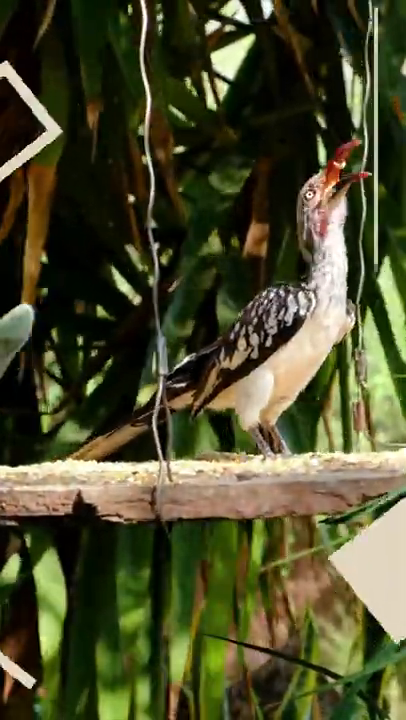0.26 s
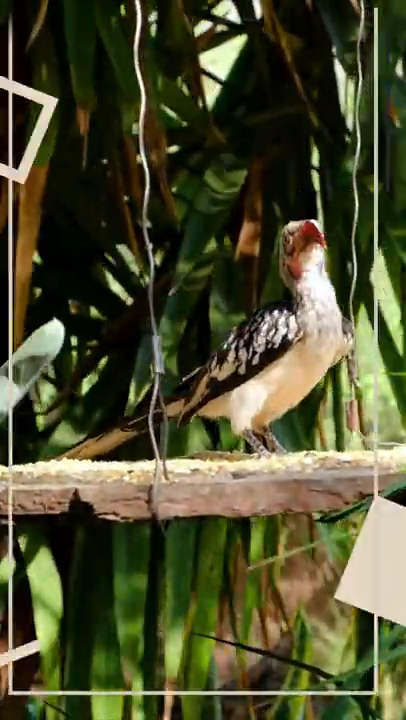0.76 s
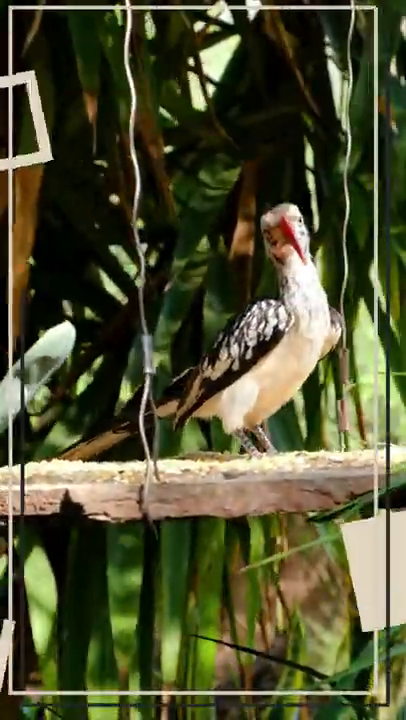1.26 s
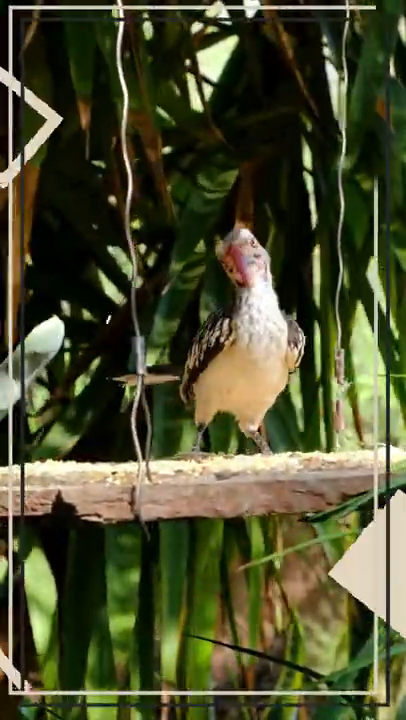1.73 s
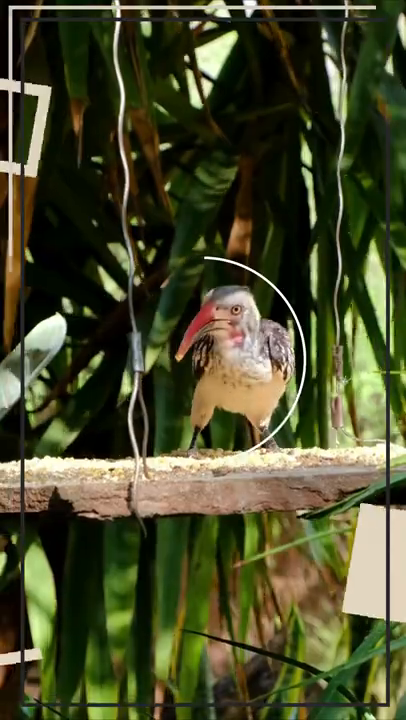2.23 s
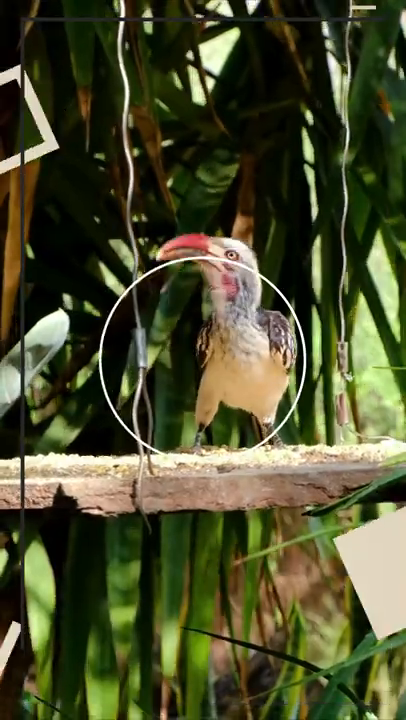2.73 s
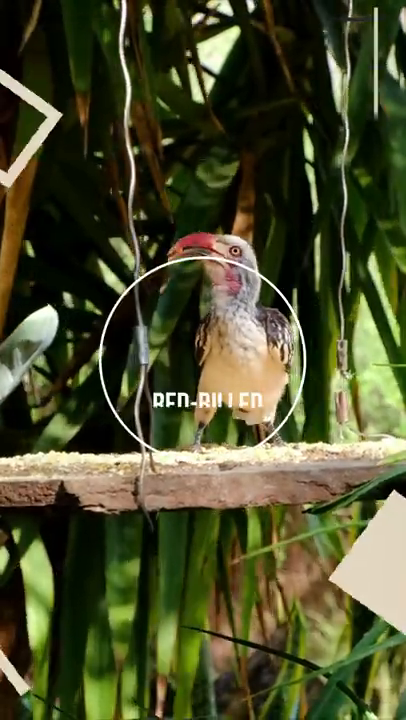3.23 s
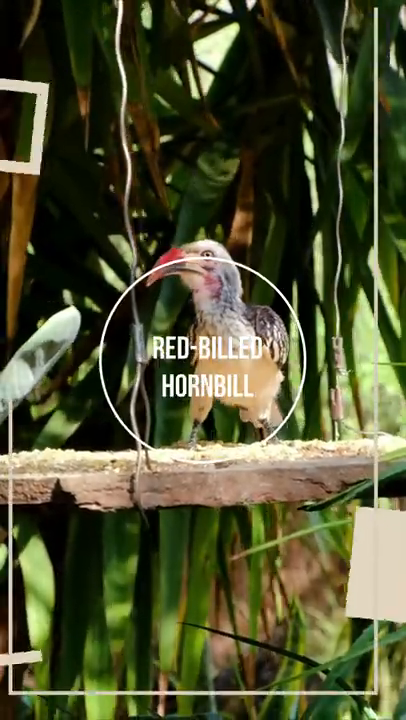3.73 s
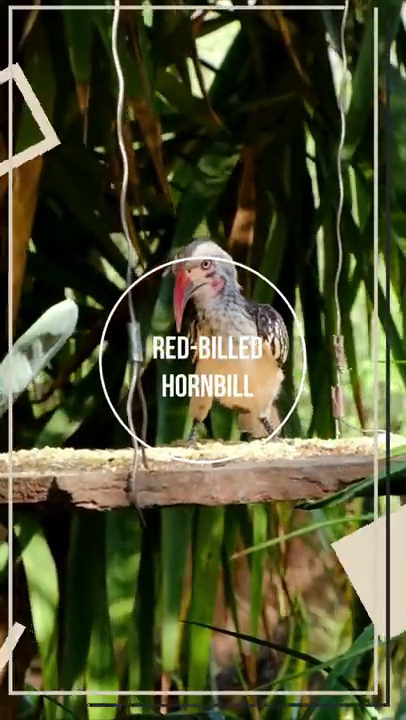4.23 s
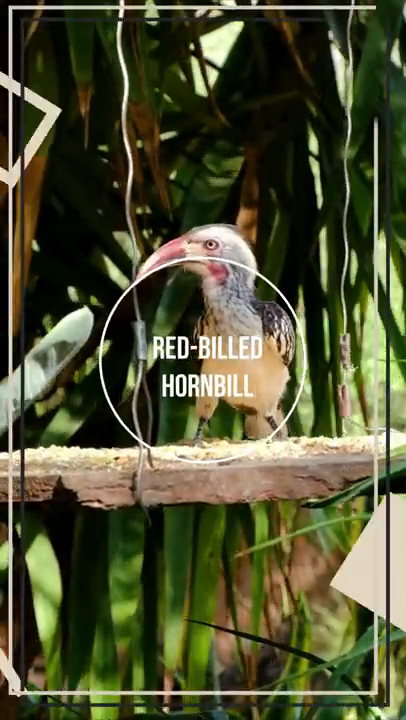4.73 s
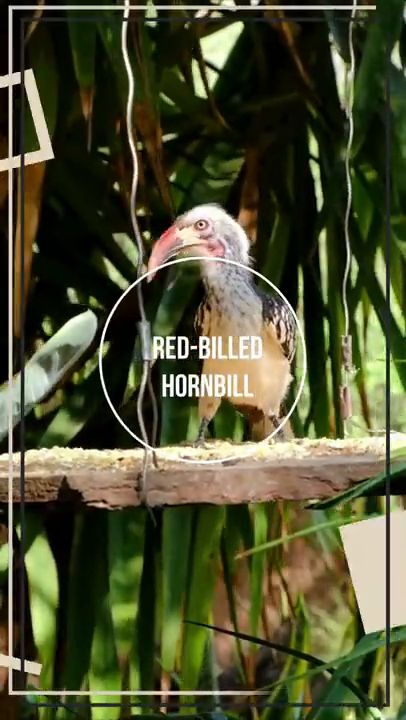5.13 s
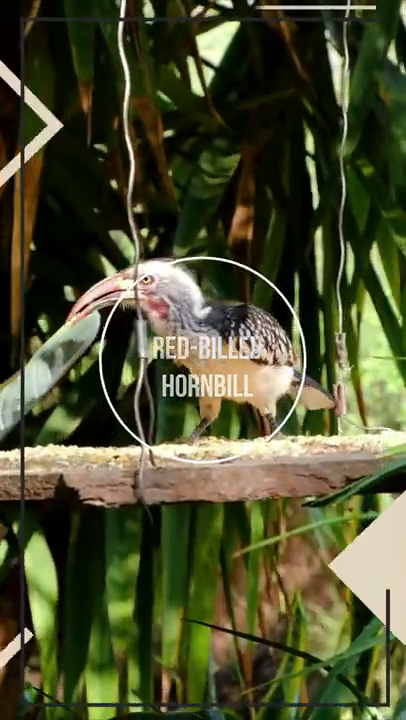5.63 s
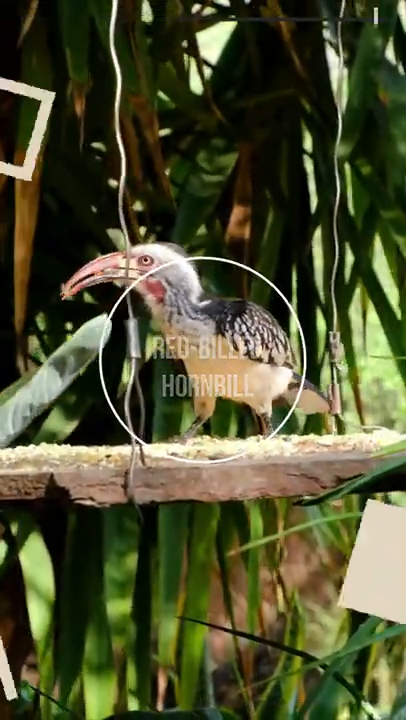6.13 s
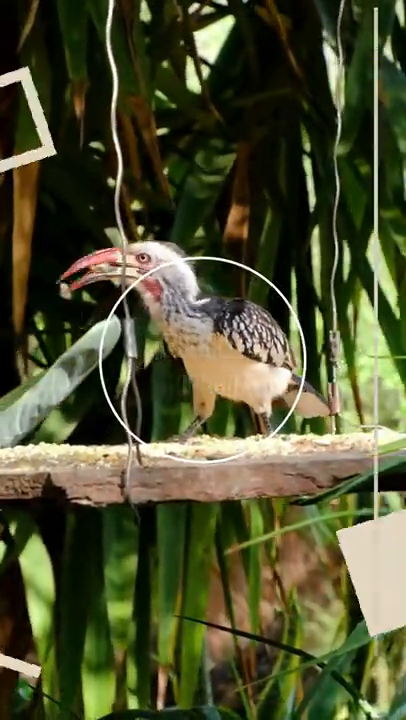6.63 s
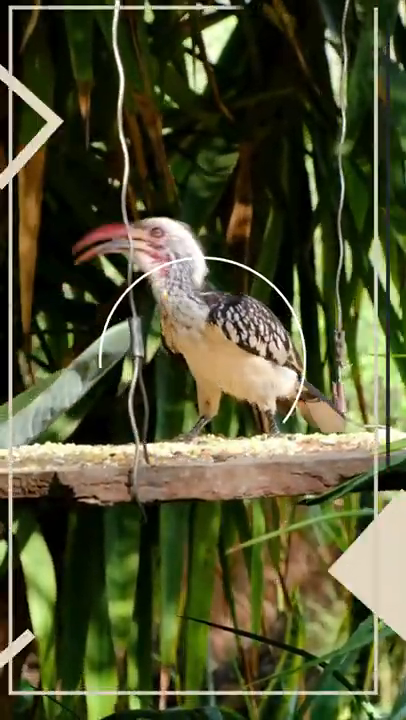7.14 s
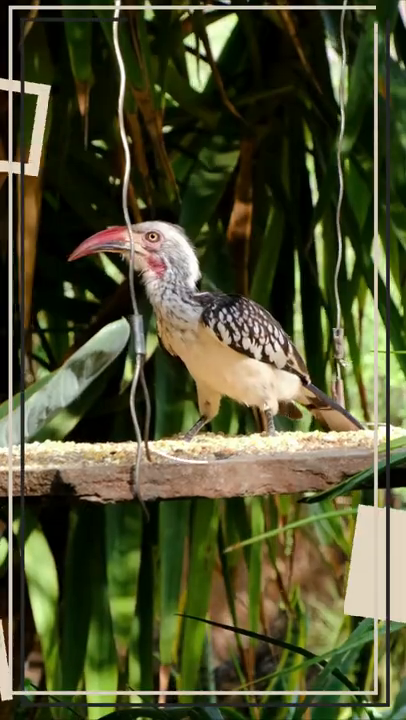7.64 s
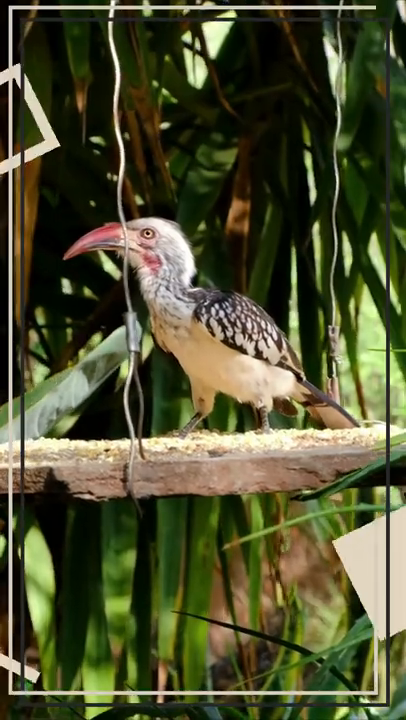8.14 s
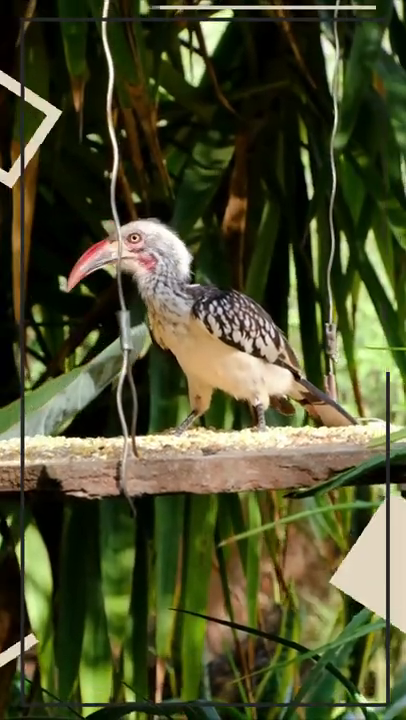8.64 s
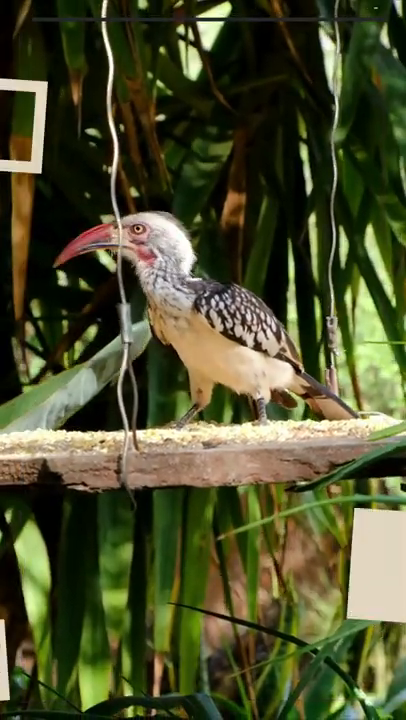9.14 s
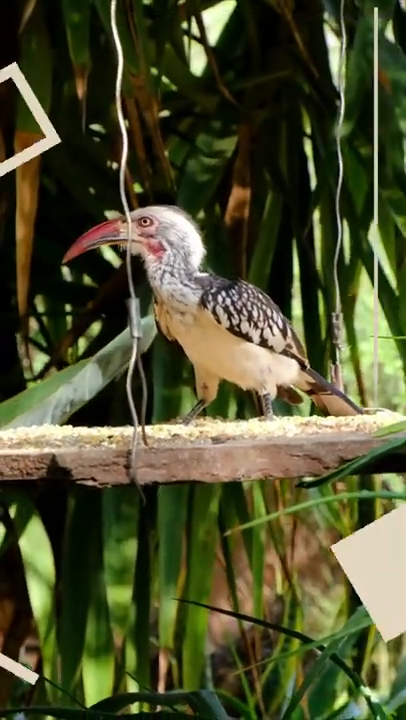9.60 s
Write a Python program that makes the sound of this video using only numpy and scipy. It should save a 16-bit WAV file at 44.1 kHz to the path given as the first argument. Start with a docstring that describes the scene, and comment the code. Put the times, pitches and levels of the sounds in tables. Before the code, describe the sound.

Steady throaty clucking from a large bird close by, over tiny bird chirps, brief buzzy trills, soft outdoor hiss and faint insects.

```python
"""A soft outdoor hush, shaped noise, and thin noise bands of far insects run from the start.
Small birds chip at once, in arched sweeps of pitch, and a hornbill on a feeding table begins an even series of
clucks: two strong partials scoop up, crack roughly and echo off the bushes. The clucks slow and sink a little.
Slurred whistles, pure bending tones, join early; three trills of fast pulses swell and stop from 3 s onward.
After 5 s come short bursts of noise, leaves that scuffle and tap."""
import sys
import numpy as np
from scipy import signal
from scipy.fft import rfft, irfft, next_fast_len
from scipy.io import wavfile

SR = 44100
rng = np.random.default_rng(int(sys.argv[2]) if len(sys.argv) > 2 else 0)


def file_out(sig):
    """Save sig as 16-bit WAV at sys.argv[1]."""
    # one column per channel
    cols = np.atleast_2d(sig).T
    # limit, then scale
    lim = np.clip(cols, -1, 1)
    pcm = np.round(lim * 32767).astype(np.int16)
    wavfile.write(sys.argv[1], SR, pcm)


N = 435266  # length in samples

# Spectrum of the hush. Each row: frequency in Hz, relative density in dB per Hz.
HUSH_SPECTRUM = [(60, -16), (135, -7.5), (300, -18.5), (400, 1.5), (520, -0.5), (900, -3.5), (1350, -6.5),
                 (1600, -17.5), (2250, -22), (2800, -13.5), (6900, -15.5), (8000, -17.5), (12000, -16.5),
                 (15500, -23.5)]
# Slow swells of the hush. Each row: time in seconds, gain of the low part in dB, gain of the hiss in dB.
HUSH_SWELLS = [(0, -3, 1), (1.5, -3.5, -0.5), (2.3, -0.5, -1), (3.5, -2.5, -1.5), (4.6, -4, 0.5),
               (5.8, 2.5, -1), (7.1, -0.5, -2), (8.1, 5, 1), (9, -1.5, -4), (9.87, -3.5, 1)]
# Bands of far insects. Each row: centre in Hz, full width at half amplitude in Hz, level before wavering in dB.
INSECT_BANDS = [(5020, 160, -65), (5540, 260, -63.5), (6570, 200, -66), (9000, 540, -67.5)]
# The nearest chips of small birds. Each row: start in seconds, level before the common chip gain in dB.
NEAR_CHIPS = [(0.0343, -32), (0.1203, -19), (0.232, -29.5), (0.2947, -21.5), (0.3538, -24.5), (0.434, -29),
              (0.5118, -28), (0.5734, -24), (0.6284, -21.5), (0.6944, -26), (0.9252, -21), (1.0003, -21.5),
              (1.2, -27.5), (1.696, -29), (2.3442, -28), (2.4886, -25), (2.6204, -26), (2.6917, -27.5),
              (3.453, -26), (3.517, -23), (4.2018, -27.5), (4.878, -27.5), (4.9574, -24), (5.0726, -25.5),
              (5.218, -29.5), (5.3366, -25.5), (5.4022, -25), (5.6577, -28.5), (5.9634, -28), (6.114, -27),
              (7.569, -28), (7.6317, -27), (7.7119, -28), (7.8087, -26.5), (8.0002, -28), (8.3695, -27),
              (8.4257, -31), (9.6048, -31.5)]
# Clucks of the hornbill. Each row: time of the crest in seconds, level in dB.
CLUCK_CRESTS = [(0.0734, -12), (.253, -13), (0.431, -12), (0.6115, -11.5), (0.7923, -12), (0.9699, -11.5),
                (1.1458, -11.5), (1.321, -11.5), (1.5001, -11), (1.68, -11), (1.855, -11.5),
                (2.0306, -11.5), (2.2074, -11.5), (2.3819, -11.5), (2.556, -11.5), (2.732, -11.5),
                (2.903, -12), (3.0787, -11.5), (3.253, -10.5), (3.4252, -12.5), (3.6061, -12.1),
                (3.7773, -11.7), (3.951, -12), (4.1214, -11), (4.2924, -12), (4.4669, -12), (4.6405, -13),
                (4.808, -13), (4.982, -13), (5.1519, -13), (5.331, -13), (5.5042, -13), (5.6795, -12),
                (5.8544, -12), (6.03, -12.3), (6.2173, -12), (6.3981, -12.5), (6.5808, -12),
                (6.7726, -12.6), (6.9649, -13), (7.1589, -13), (7.346, -13), (7.5418, -13), (7.7351, -15),
                (7.9308, -14.5), (8.1252, -13.5), (8.3313, -14), (8.52, -11.5), (8.729, -14),
                (8.933, -14.5), (9.133, -14), (9.3303, -13.5), (9.5319, -14), (9.729, -13)]
# Second partial of the cluck. Each row: time in seconds, level over the first partial before envelopes in dB.
SECOND_PARTIAL = [(0, 0.65), (2.2, 1.6), (3.2, 1.4), (5.4, 2.3), (6.3, 2), (7.3, 2.5), (7.9, .4), (8.4, 3),
                  (9.8, 2.5)]
# Weak overtones of the cluck. Each row: multiple of the note, level relative to the first partial in dB
# in the first cluck, the same in the last, both before flicker and envelope.
WEAK_OVERTONES = [(3, -29.5, -39), (4, -37, -35.5), (5, -40.5, -39.5)]
# Reflections from the table and the nearest plants. Each row: mean delay in seconds,
# level before the bird turns in dB, low cut in Hz.
REFLECTIONS = [(.018, -16.5, 600), (.053, -17.5, 973), (.077, -22.5, 1320), (.112, -33, 950)]
# The nearest whistles and slurs. Each row: start in seconds, length in seconds, start pitch in Hz,
# middle pitch in Hz, end pitch in Hz, level before flutter in dB.
NEAR_WHISTLES = [(.307, .12, 4100, 3280, 2760, -43.5), (0.827, 0.14, 3400, 3390, 2630, -44),
                 (1.249, .037, 3250, 3640, 4580, -51), (1.409, 0.11, 3450, 3406, 2820, -47.5),
                 (1.522, .013, 4730, 3630, 3100, -35), (1.553, .015, 7700, 6060, 3770, -45),
                 (1.589, 0.015, 3700, 4820, 7540, -38.5), (1.625, .014, 3500, 5000, 7440, -38.5),
                 (1.745, .04, 3280, 3740, 4300, -50), (4.043, 0.31, 6330, 4000, 2730, -51.5),
                 (4.281, .16, 2770, 2990, 4450, -48), (5.548, 0.27, 6400, 4200, 3100, -51),
                 (5.893, 0.071, 4700, 3760, 3160, -49.5), (6.93, 0.132, 3080, 3000, 3030, -54.5),
                 (7.238, 0.26, 2840, 2690, 3220, -54.5), (7.397, 0.11, 3200, 3970, 4200, -51),
                 (8.135, 0.065, 4700, 4100, 3120, -55), (9.252, .1, 3100, 2880, 2570, -52.5)]
# Buzzy trills. Each row: end in seconds, swell length in seconds, mean pitch in Hz, final level in dB.
TRILL_SWELLS = [(3.256, 0.17, 3654, -23.5), (4.158, 0.21, 3675, -26), (8.494, 0.23, 3668, -22)]
# Scuffles and taps among the leaves. Each row: start in seconds, length in seconds, centre in Hz,
# width between the -3 dB points in octaves, level before unevenness in dB.
LEAF_SCUFFLES = [(5.298, 0.0064, 1470, 1.1, -34.5), (5.699, 0.026, 500, .4, -56),
                 (7.907, 0.22, 1720, 0.37, -46), (8.018, 0.032, 430, 0.72, -42),
                 (8.446, 0.011, 630, 0.9, -32), (8.454, 0.017, 478, 0.29, -33),
                 (8.45, .05, 1820, 0.43, -47.5)]

HUSH_DB = -48  # before the swells
# random chips of the flock, close by and far off: mean level before the common chip gain, and spread
FLOCK_DB, FAR_FLOCK_DB, FLOCK_SPREAD_DB = -32.5, -38, 1.55
# as the bird tires its note sinks and its onset moves nearer the crest: (first cluck, last cluck)
NOTE_HZ = (629.7, 593.6)
LEAD_S = (0.026, 0.025)
# loudness of a cluck: it catches at a share of full strength, swells to the crest, holds and lets go
CATCH_S, CATCH_SHARE, HOLD_S, RELEASE_S = 0.0036, 0.34, 0.01, .02
# pitch of a cluck: it drops onto the note from above, creeps upward, then lifts to where the voice cracks
DROP_SHARE, DROP_S, CREEP_HZ_PER_S = 0.2004, 0.0054, 660
CRACK_HZ, LIFT_AFTER_S, LIFT_S = 710.5, 0.0095, 0.0041
# roughness of the clean note and what the crack adds after the crest
CLEAN_ROUGH, CRACK_ROUGH, CRACK_AFTER_S, CRACK_RISE_S = 0.022, 0.36, 0.0042, .015
# the second partial enters late and fades after the crest, down to a small share
SECOND_LAG_S, SECOND_FADE_S, SECOND_SHARE = 0.0017, 0.009, 0.031
# rasp of air in the voice: centre, width, level before roughness scales it
RASP_HZ, RASP_OCTAVES, RASP_DB = 1340, 0.76, -25


def undb(db):
    """Amplitude ratio of a level difference in decibels."""
    return 10 ** (np.asarray(db) / 20)


def add(track, start_s, sound):
    """Superposition: mix a sound into a track from a given time, trimming what falls outside."""
    i = int(round(start_s * SR))
    sound, i = sound[max(-i, 0):], max(i, 0)
    track[i:i + len(sound)] += sound[:max(len(track) - i, 0)]


def colour(x, db_at):
    """Linear filtering: multiply the spectrum by a gain in dB that is a function of frequency."""
    size = next_fast_len(len(x))
    hz = np.maximum(np.arange(size // 2 + 1) * SR / size, 1)
    return irfft(rfft(x, size) * undb(db_at(hz)), size)[:len(x)]


def noise(n, db_at):
    """Random pressure with a shaped spectrum, scaled to unit standard deviation."""
    x = colour(rng.standard_normal(n), db_at)
    return x / x.std()


def octave_band(centre_hz, octaves):
    """Band shape: the gain falls with the square of the distance in octaves, to -3 dB at half the width."""
    return lambda f: -3 * (np.log2(f / centre_hz) / octaves * 2) ** 2


def walk(n, rate):
    """Irregular modulation: random values joined by straight lines, so many a second."""
    at = np.arange(n) / SR * rate
    knots = np.arange(int(at[-1]) + 2)
    return np.interp(at, knots, rng.standard_normal(len(knots)))


def turns(hz):
    """Phase in radians as the running integral of a moving frequency."""
    return 2 * np.pi * np.cumsum(hz) / SR


def ease(u):
    """Smooth step from 0 to 1 as u goes from 0 to 1."""
    return np.sin(np.pi / 2 * np.clip(u, 0, 1)) ** 2


def foliage(x, wet_db, t60):
    """Multiple scattering: the direct sound plus an exponentially dying tail from countless leaves."""
    t = np.arange(int(t60 * SR)) / SR
    decay = np.exp(-np.log(1000) * t / t60)
    build_up = 1 - np.exp(-t / 0.00095)
    tail = rng.standard_normal(len(t)) * decay * build_up
    response = tail * undb(wet_db) / np.linalg.norm(tail)
    response[0] = 1  # direct sound
    return signal.fftconvolve(x, response)


def hush(low_walk_db=3.5, hiss_walk_db=0.5):
    """Broadband noise of distant air and leaves: the low part swells slowly, the hiss is steadier."""
    hz, db = np.transpose(HUSH_SPECTRUM)
    air = noise(N, lambda f: np.interp(np.log(f), np.log(hz), db))
    low = colour(air, lambda f: -10 * np.log10(1 + (f / 2000) ** 4))
    hiss = air - low
    s, *columns = np.transpose(HUSH_SWELLS)
    low_db, hiss_db = (np.interp(np.arange(N) / SR, s, column) for column in columns)
    low = low * undb(low_db + low_walk_db * walk(N, 12))
    hiss = hiss * undb(hiss_db + hiss_walk_db * walk(N, 5.1))
    return undb(HUSH_DB) * (low + hiss)


def insects():
    """Incoherent summation: a far chorus merges into a few wavering bands of noise."""
    out = np.zeros(N)
    for hz, width, db in INSECT_BANDS:
        band = noise(N, lambda f: -20 * np.log10(1 + (2 * (f - hz) / width) ** 2))
        waver_db = 2 * walk(N, 1) + 2 * walk(N, 32)
        out += band * undb(db + waver_db)
    return out


def chip(length_s=.0068, foot_hz=3300, top_hz=7200):
    """Frequency sweep: the pitch of one chip runs up and down again within a few milliseconds."""
    stretch, lift = rng.standard_normal(2)
    n = int(length_s * SR * (1 + 0.049 * stretch))
    arch = np.abs(np.sin(np.pi * np.linspace(0, 1, n)))
    peak_hz = top_hz * (1 + 0.028 * lift)
    return arch ** .5 * np.sin(turns(foot_hz + (peak_hz - foot_hz) * arch ** 1.447))


def flock(db, count):
    """Random arrivals: times and levels of chips that come loosely one after another."""
    when = (np.arange(count) + rng.uniform(0, 1, count)) / count * N / SR
    return list(zip(when, db + FLOCK_SPREAD_DB * rng.standard_normal(count)))


def chips(direct_db=-5, near_db=-23):
    """Direct-to-scattered ratio: the fainter a bird, the more of its sound comes by way of the leaves."""
    out = np.zeros(N)
    for s, db in list(NEAR_CHIPS) + flock(FLOCK_DB, count=64) + flock(FAR_FLOCK_DB, count=56):
        wet_db = min(-6.5 + 0.59 * (near_db - db), -2)  # the scattered share has a ceiling
        add(out, s, undb(db + direct_db) * foliage(chip(), wet_db, t60=0.028))
    return foliage(out, wet_db=-11, t60=0.18)[:N]


def scoop(t, lead, note_hz):
    """Frequency glide of one cluck: drop, creep and lift, with t counted from its crest."""
    drop = DROP_SHARE * np.exp(-((t + lead) / DROP_S) ** 2)
    lift = 1 / (1 + np.exp((LIFT_AFTER_S - t) / LIFT_S))
    return note_hz * (1 + drop) + CREEP_HZ_PER_S * t + (CRACK_HZ - note_hz) * lift


def strengths(t, lead):
    """Resonance and envelope: the second partial slides off the throat resonance as the pitch lifts."""
    release = 1 - ease((t - HOLD_S) / RELEASE_S)
    swell = CATCH_SHARE + (1 - CATCH_SHARE) * ease(1 + t / lead)
    low = ease((t + lead) / CATCH_S) * swell
    fade = SECOND_SHARE + (1 - SECOND_SHARE) * np.exp(-(np.maximum(t, 0) / SECOND_FADE_S) ** 2)
    high = ease(1 + t / (lead - SECOND_LAG_S)) ** 0.74 * fade
    return low * release, high * release


def cluck(t, tired, second_db, note_scatter=0.0036, overtone_scatter_db=2.0, overtone_blur=0.4):
    """Harmonic voice of the syrinx: two strong partials scoop upward, then irregular vibration cracks them."""
    n = len(t)
    lead = np.interp(tired, (0, 1), LEAD_S)
    note_hz = np.interp(tired, (0, 1), NOTE_HZ) * (1 + note_scatter * rng.standard_normal())
    low, high = strengths(t, lead)
    rough = CLEAN_ROUGH + CRACK_ROUGH * ease((t - CRACK_AFTER_S) / CRACK_RISE_S)
    phase = turns(scoop(t, lead, note_hz) * (1 + 0.087 * rough * walk(n, 596)))
    second = undb(second_db) * high * np.cos(2 * phase) * (1 + 0.26 * rough * walk(n, 401))
    voice = low * np.cos(phase) - second
    # the weak overtones grow with effort, are unsteady, and differ from cluck to cluck
    for k, *levels in WEAK_OVERTONES:
        db = np.interp(tired, (0, 1), levels)
        flicker_db = overtone_scatter_db * rng.standard_normal() + 3.7 * walk(n, 123)
        overtone = np.cos(round(k) * phase + overtone_blur * walk(n, 199))
        voice += low * high ** 0.68 * undb(db + flicker_db) * overtone
    # as it cracks, strong and weak cycles alternate, a tone appears between the partials and air rasps
    between = 0.54 * walk(n, 204) * np.cos(phase + phase / 2)
    rasp = undb(RASP_DB) * noise(n, octave_band(RASP_HZ, RASP_OCTAVES))
    return voice + low * rough * (between + rasp)


def hornbill(turned_db=-4.0, echo_scatter_s=0.00101):
    """Reflection: each cluck echoes at nearly the same delays, slightly scattered, and weaker as the bird turns."""
    out = np.zeros(N)
    t = np.arange(-.03, .04, 1 / SR)  # seconds from the crest
    for s, db in CLUCK_CRESTS:
        tired = s / CLUCK_CRESTS[-1][0]  # 0 at the start of the scene, 1 at the last cluck
        second_db = np.interp(s, *np.transpose(SECOND_PARTIAL))
        call = undb(db) * cluck(t, tired, second_db)
        add(out, s + t[0], foliage(call, wet_db=-21.5, t60=0.25))
        # leaves throw back the upper partial better than the lower
        for delay, echo_db, cut_hz in REFLECTIONS:
            low_cut = signal.butter(2, cut_hz, "high", fs=SR, output="sos")
            echo = undb(echo_db + turned_db * tired) * signal.sosfilt(low_cut, call)
            add(out, s + t[0] + delay + echo_scatter_s * rng.standard_normal(), echo)
    return out


def slur(length, pitches, flutter_db=3):
    """Pure tone whose frequency follows a parabola through three pitches while its level flutters."""
    u = np.linspace(0, 1, int(length * SR))
    hz = np.polyval(np.polyfit([0, .5, 1], pitches, 2), u) * (1 + 0.011 * walk(len(u), 162))
    return undb(flutter_db * walk(len(u), 73)) * np.sin(np.pi * u) * np.sin(turns(hz))


def whistles(count=84, far_db=-59, far_hz=2950, range_octaves=0.45):
    """Scattering: slurred notes from birds further off, over a faint sprinkling of more distant ones."""
    out = np.zeros(N)
    notes = [(s, undb(db) * slur(length, pitches)) for s, length, *pitches, db in NEAR_WHISTLES]
    for i, (when, length, high, bend, fall, loud) in enumerate(rng.uniform(0, 1, (count, 6))):
        contour = .3 * np.array([fall - .3, (bend - .5) / 2, .3 - fall])  # octaves
        pitches = far_hz * 2 ** (range_octaves * (high - .5) + contour)
        strength = undb(far_db) * (.5 + loud / 2)
        notes.append(((i + when) / count * N / SR, strength * slur(.04 + .1 * length, pitches)))
    # each note is smeared first by the bush its bird sits in, then by the whole thicket
    for s, note in notes:
        add(out, s, foliage(note, wet_db=4, t60=0.026))
    return foliage(out, wet_db=-6, t60=1.0)[:N]


def trills(pulse_hz=52, rise_db=27, droop=0.0092, lower_octave_db=-25):
    """Amplitude modulation: fast drooping pulses grow and stop, with a faint tone an octave below."""
    out = np.zeros(N)
    for end, length, hz, db in TRILL_SWELLS:
        n = int(length * SR)
        cycle = (np.cumsum(pulse_hz * (1 + 0.099 * walk(n, 22.8))) / SR) % 1  # 0-1 through each pulse
        phase = turns(hz * (1 + droop * (.5 - cycle) + 0.0078 * walk(n, 57.9)))
        swell = undb(db - rise_db * np.linspace(1, 0, n) ** 2) * signal.windows.tukey(n, .1)
        tone = np.sin(phase) + undb(lower_octave_db) * np.sin(phase / 2)
        call = swell * np.sin(np.pi * cycle) * tone
        near_scatter = foliage(call, wet_db=-7, t60=.3)
        add(out, end - length, foliage(near_scatter, wet_db=-18, t60=2.0))
    return out


def scuffles():
    """Friction and impact of leaves as short, uneven bursts of band-limited noise."""
    out = np.zeros(N)
    for s, length, hz, octaves, db in LEAF_SCUFFLES:
        n = int(length * SR)
        burst = noise(n, octave_band(hz, octaves))
        add(out, s, burst * undb(db + 1.6 * walk(n, 146)) * signal.windows.tukey(n, .6))
    return foliage(out, wet_db=-7, t60=1.0)[:N]


def scene():
    """Superposition of all sources in one channel."""
    return (hush() + insects() + chips() + hornbill() + whistles() + trills() + scuffles())[None]


def record(dry):
    """Band limiting: a steep low cut, with a little of the sound mixed back in, and a steep top cut."""
    low_cut = signal.butter(10, 355, "high", fs=SR, output="sos")
    top_cut = signal.ellip(10, .1, 80, 15400, fs=SR, output="sos")
    # the bass stays very faint
    balanced = signal.sosfiltfilt(low_cut, dry) + undb(-16.0) * dry
    return signal.sosfilt(top_cut, balanced)


dry = scene()
out = record(dry)
file_out(out)
```